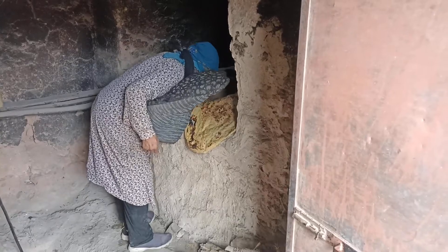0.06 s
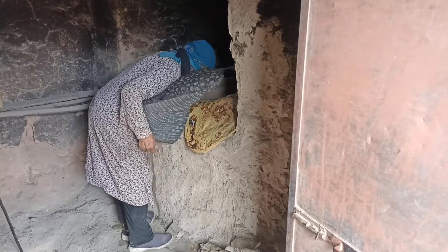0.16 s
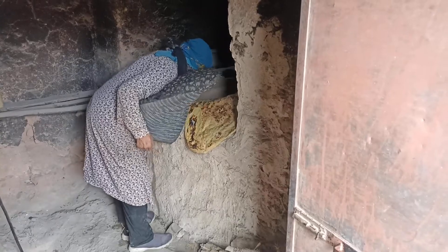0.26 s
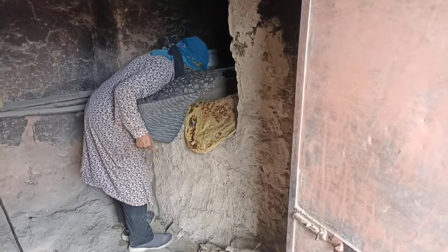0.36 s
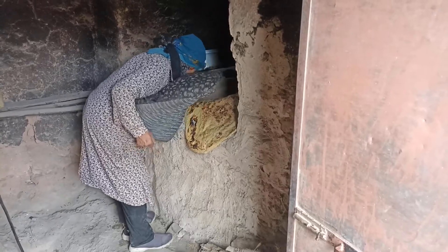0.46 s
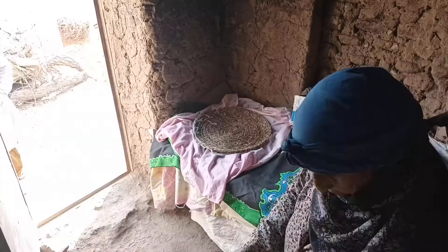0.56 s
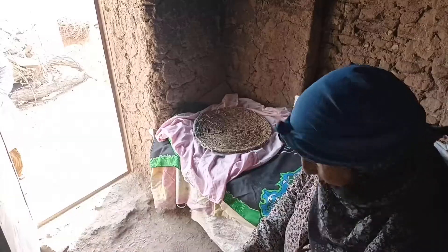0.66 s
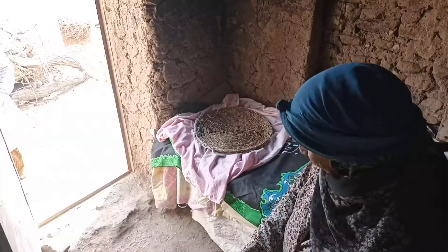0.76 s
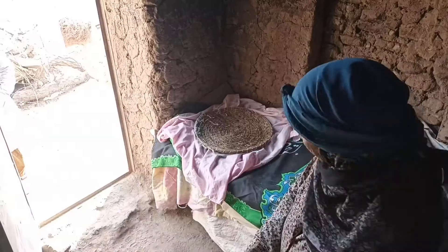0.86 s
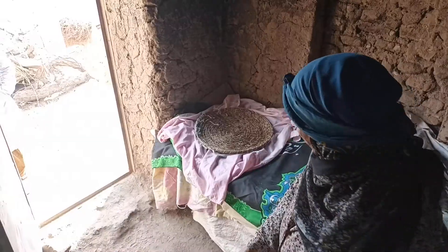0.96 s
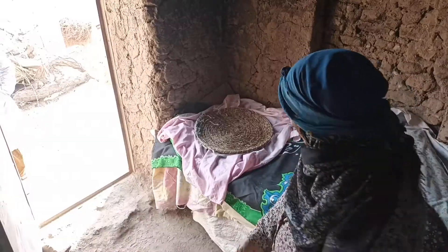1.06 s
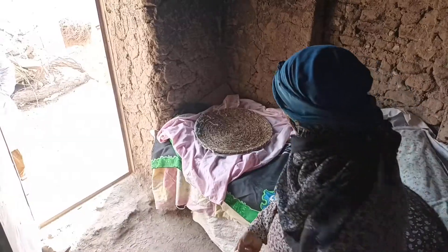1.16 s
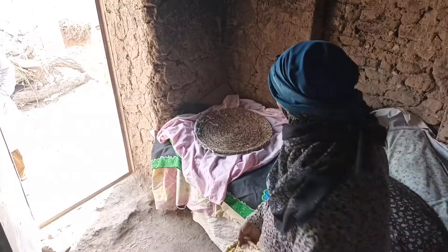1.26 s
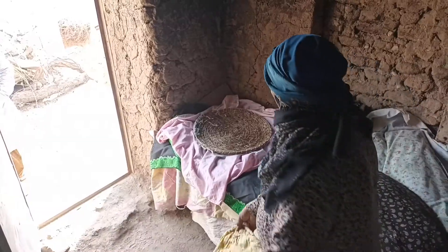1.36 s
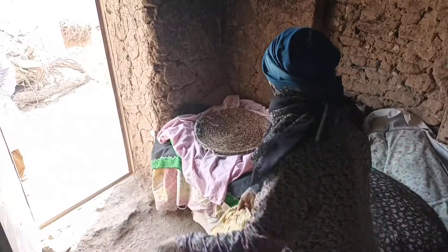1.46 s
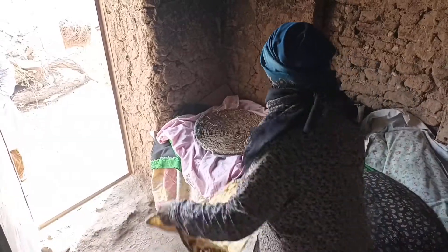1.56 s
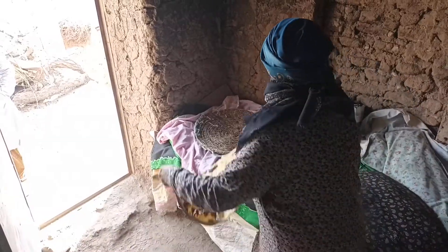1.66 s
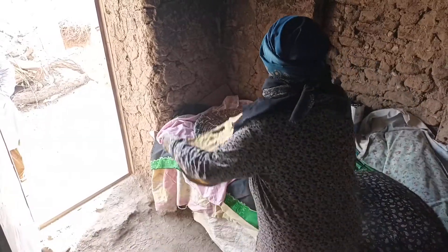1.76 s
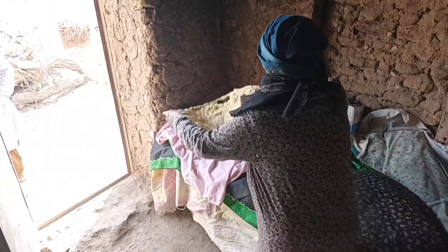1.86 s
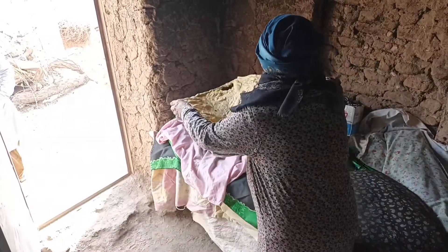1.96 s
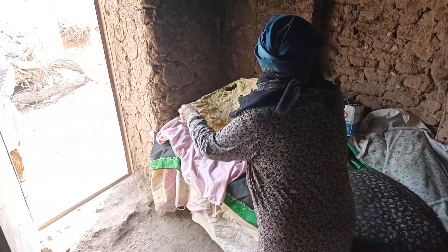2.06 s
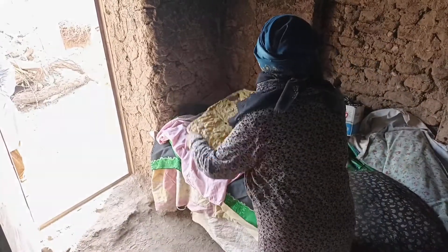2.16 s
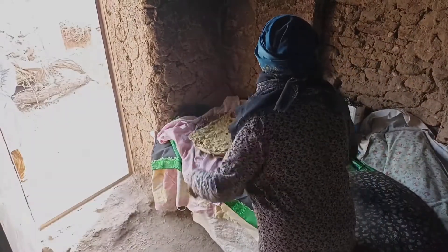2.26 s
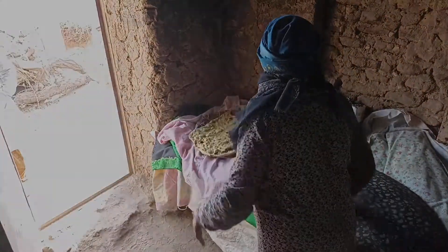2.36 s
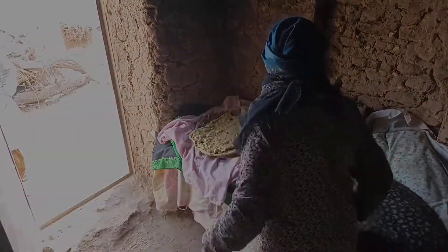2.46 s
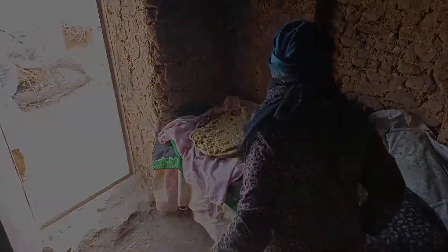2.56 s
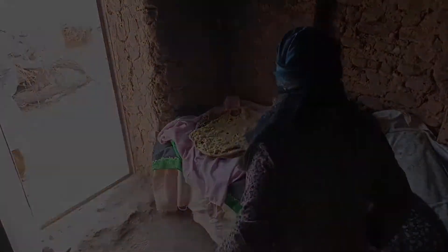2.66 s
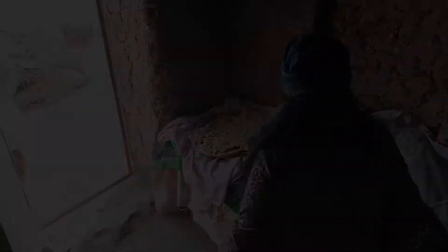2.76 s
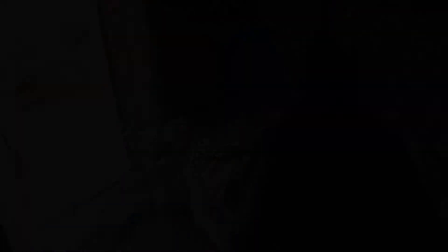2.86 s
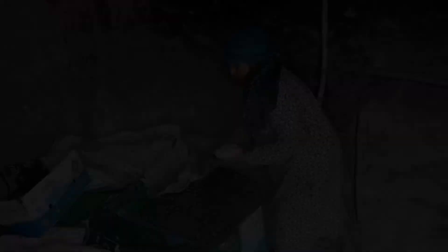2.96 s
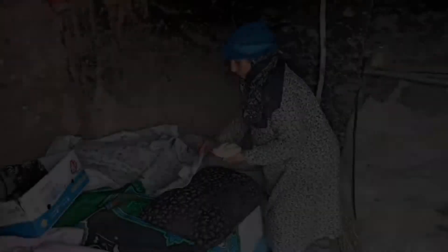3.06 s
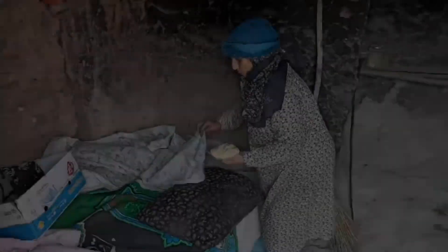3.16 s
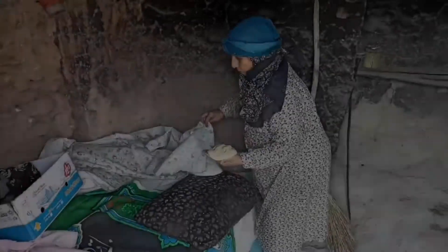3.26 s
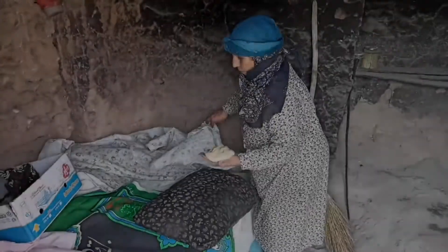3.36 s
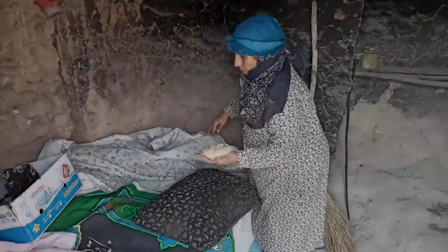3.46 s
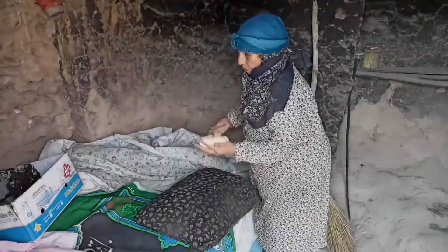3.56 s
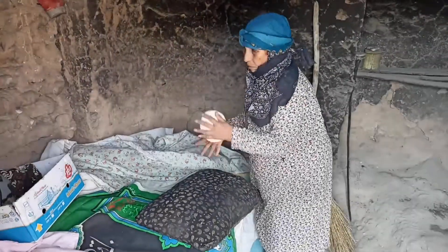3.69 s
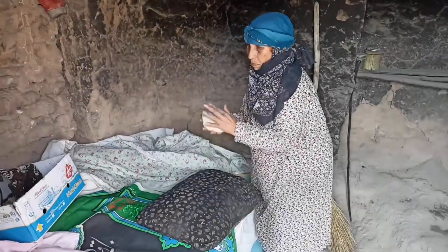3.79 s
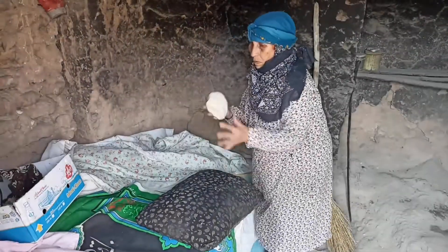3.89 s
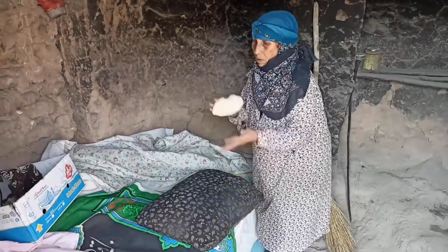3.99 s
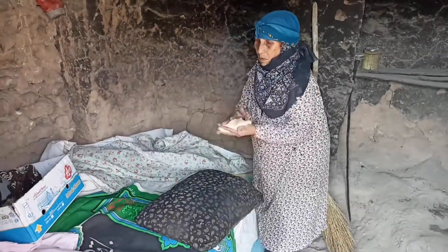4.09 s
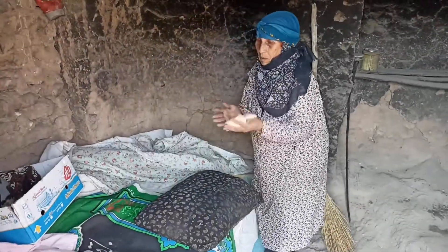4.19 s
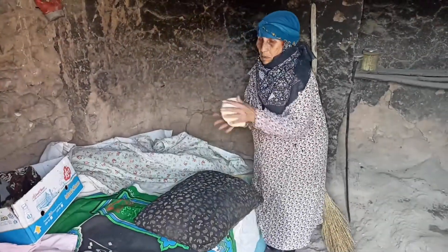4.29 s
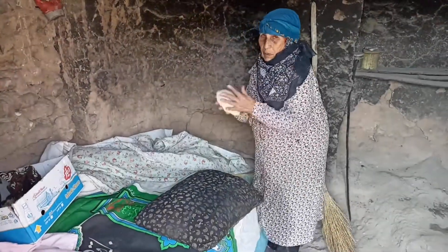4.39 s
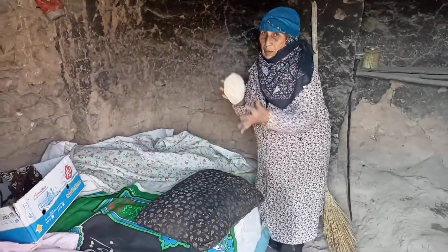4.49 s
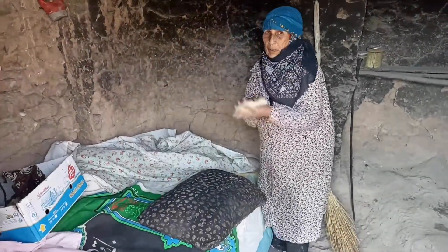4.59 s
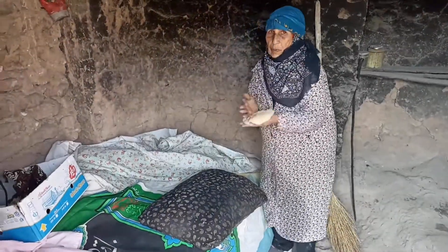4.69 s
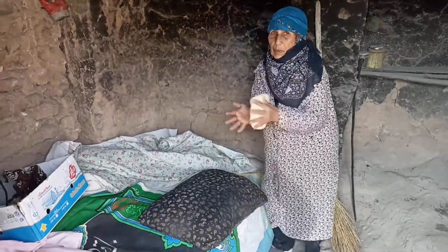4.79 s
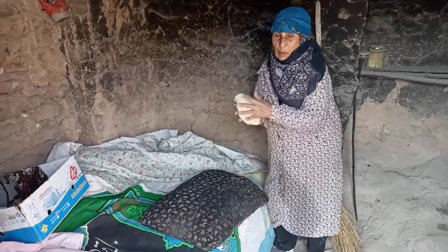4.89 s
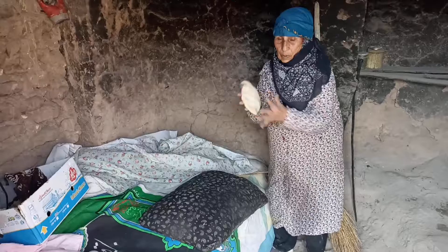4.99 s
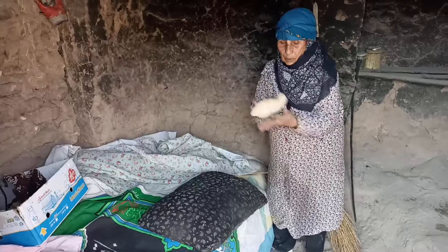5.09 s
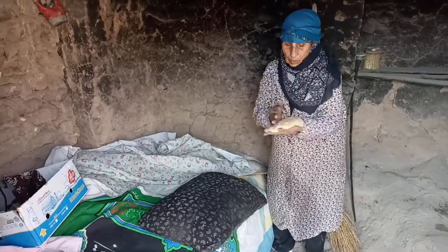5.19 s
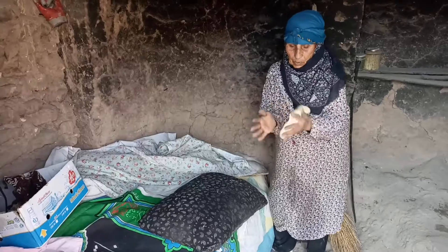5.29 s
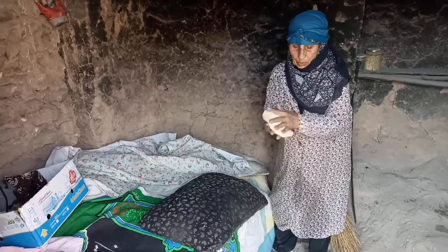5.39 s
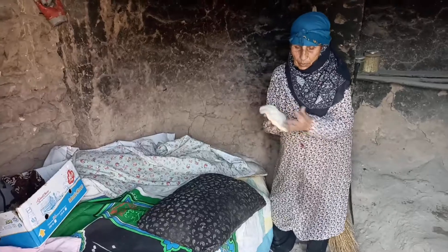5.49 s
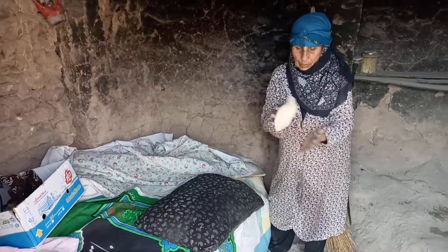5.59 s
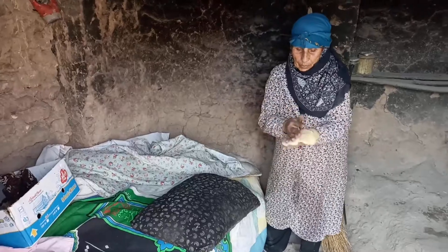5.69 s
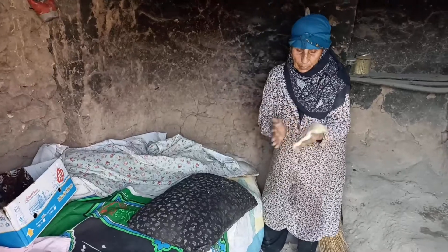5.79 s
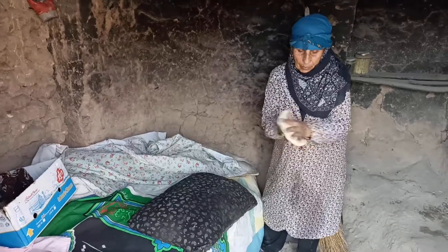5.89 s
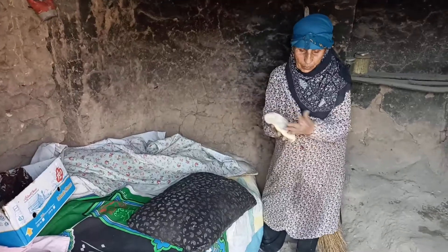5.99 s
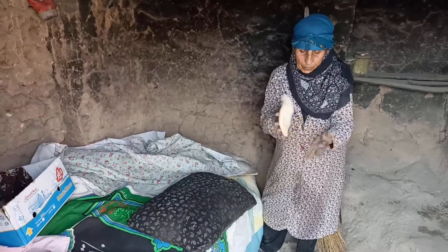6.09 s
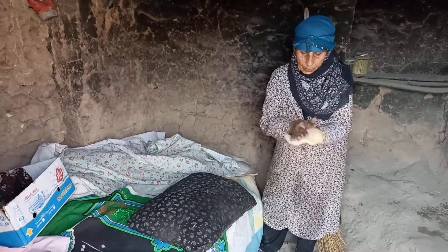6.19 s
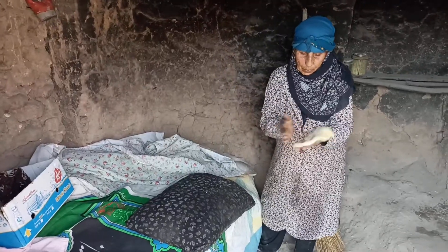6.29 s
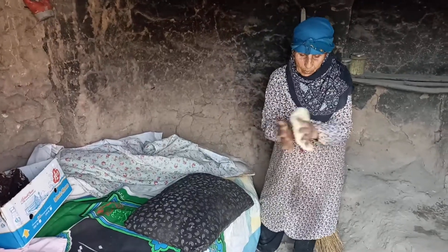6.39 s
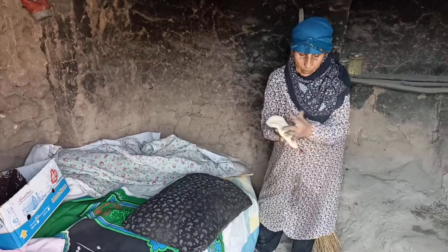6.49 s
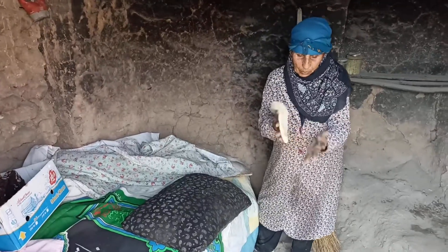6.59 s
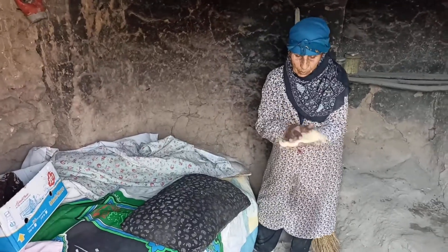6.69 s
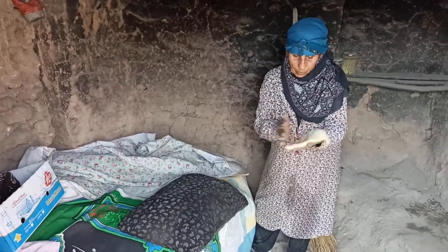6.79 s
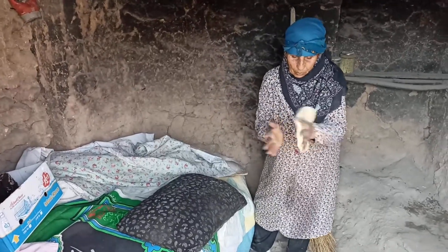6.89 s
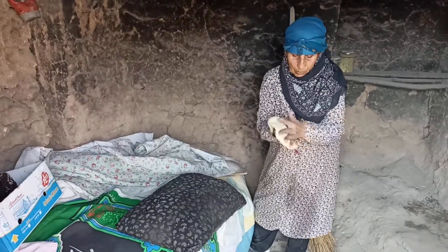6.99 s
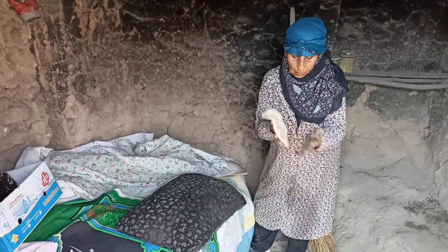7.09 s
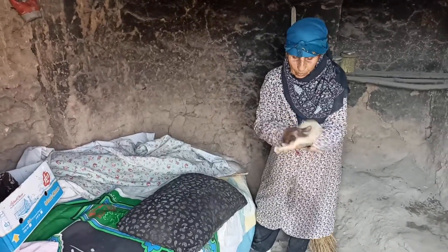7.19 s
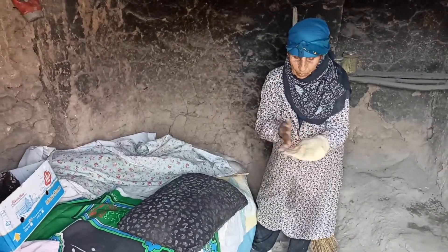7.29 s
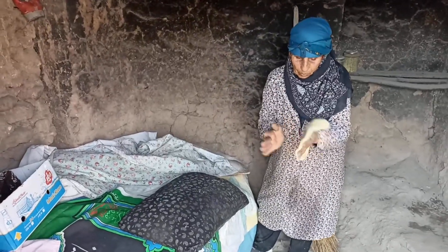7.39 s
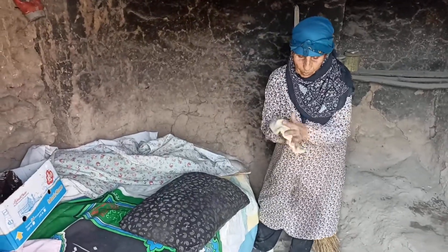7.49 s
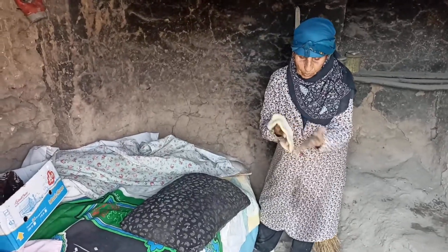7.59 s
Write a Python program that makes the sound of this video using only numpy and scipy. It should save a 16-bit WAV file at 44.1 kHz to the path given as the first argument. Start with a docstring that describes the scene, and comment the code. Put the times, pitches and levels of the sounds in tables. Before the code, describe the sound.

Soft raw dough slapped steadily from palm to palm in a small earthen room, after a dry flatbread slides onto a woven tray.

```python
"""A baker slaps raw dough from palm to palm in a small earthen bakehouse, almost four times a second.
Each slap is a thump of soft dough, a pop of trapped air and a wet smack made of many tiny clicks.
Before that a flat loaf slides onto a woven tray: rough clicks coloured as dry crust, over a low rumble.
Near walls throw the sounds back at once; clothes rustle and crust ticks, made of coloured clicks.
Filtered noise makes a very quiet room, and sine waves make poultry calling far away."""
import sys
import numpy as np
from scipy import signal
from scipy.fft import rfft, irfft
from scipy.io import wavfile
from scipy.ndimage import uniform_filter1d

SR = 44100
rng = np.random.default_rng(int(sys.argv[2]) if len(sys.argv) > 2 else 0)


def dump_mix(stems):
    """Bounce the given channels to the path in sys.argv[1] as a 16-bit WAV at rate SR."""
    frames = np.atleast_2d(stems).T  # one column per channel
    limited = np.clip(frames, -1, 1)  # hard clip at full scale
    pcm = np.round(limited * 32767).astype(np.int16)
    wavfile.write(sys.argv[1], SR, pcm)


N = 337365
T = np.arange(N) / SR  # time of every sample, s

# slaps of dough on palm: t/s, thump f/Hz, smack f/Hz, then thump, air pop and skin smack level/dB
SLAP_EVENTS = [(3.8534, 273, 2550, -37, -47.5, -37.5), (4.138, 304, 2160, -14.5, -17, -22.5),
               (4.414, 295, 2060, -27, -28, -27), (4.688, 284, 2110, -17, -24, -18.5),
               (4.9492, 289, 2600, -18, -31, -28), (5.2111, 313, 1660, -13, -24.5, -20.5),
               (5.4812, 308, 1810, -15.5, -22.5, -23.5), (5.7395, 338, 3550, -19.5, -29.5, -17.5),
               (6.0, 224, 2980, -25.5, -28, -24), (6.2603, 287.4, 3550, -18, -32.5, -18),
               (6.515, 310, 2320, -19, -26.5, -19.5), (6.7725, 321.5, 1870, -17, -23, -18.5),
               (7.0336, 319, 1890, -17.5, -22.5, -16.5), (7.2928, 335, 1624, -18, -19.5, -21.5),
               (7.5518, 335, 1790, -19, -23, -22)]
# tone of wet spray and crisp ticks: f/Hz, level/dB
SPRAY_TONE = [(2000, -33.5), (5000, -16), (6300, 1.5), (8300, 1), (10500, 3.5), (12000, 7), (15500, -1)]
# tone of dry crust and of grazing fingers: f/Hz, level/dB
CRUST_TONE = [(200, -24.5), (400, -8), (800, -8), (1100, -10), (1600, -9.5), (2800, -9.5), (4000, -13),
              (8400, -18), (13300, -14.5), (16000, -24.5)]
# tone of the rumbling tray and of soft bumps: f/Hz, level/dB
TRAY_TONE = [(25, -50), (55, -13), (100, 11.5), (170, -1), (280, -6), (500, -15), (1000, -36)]
# tone of rubbing cloth: f/Hz, level/dB
CLOTH_TONE = [(150, -2), (400, 4.5), (800, 4), (1400, -0.5), (2300, 4), (3400, -0.5), (4600, -6.5),
              (8500, -14), (12500, -15), (16000, -11.5)]


def undb(db):
    """Turn decibels into a gain."""
    return 10 ** (np.asarray(db) / 20)


def unit(x):
    """Scale to an rms (average strength) of 1."""
    return x / np.sqrt(np.mean(x ** 2))


def blow(x):
    """Scale a short sound so its energy equals rms 1 over a fiftieth of a second."""
    return x / np.sqrt(np.sum(x ** 2) / (SR / 50))


def on_log(hz, points):
    """Read a curve of (Hz, value) points, with pitch on a log axis as we hear it."""
    f, value = np.transpose(points)
    return np.interp(np.log(np.maximum(hz, 1)), np.log(f), value)


def colour(x, points):
    """Filter to a (Hz, dB) curve; folding the cepstrum keeps the response from starting early."""
    size = 4096
    gain = undb(on_log(np.fft.rfftfreq(size, 1 / SR), points))
    cepstrum = irfft(np.log(gain))
    cepstrum[1:size // 2] *= 2
    cepstrum[size // 2 + 1:] = 0
    response = irfft(np.exp(rfft(cepstrum)))
    return signal.fftconvolve(x, response)[:len(x)]


def lowpass(x, hz, order=1):
    """Roll off smoothly above hz."""
    sos = signal.butter(order, min(hz, SR / 2 - 1), fs=SR, output="sos")
    return signal.sosfilt(sos, x + 1e-18)


def resonance(x, hz, width_hz):
    """Ring at one pitch, as one band-pass resonance."""
    return signal.lfilter(*signal.iirpeak(hz, hz / width_hz, SR), x)


def even(x, amount=0.71):
    """Level out the chance peaks and holes in the spectrum of a short burst."""
    spectrum = rfft(x)
    power = np.abs(spectrum) ** 2
    levelling = (power + power.mean() / 20) ** (min(amount, 1) / 2)
    return irfft(spectrum / levelling, len(x))


def add(out, s, x):
    """Mix x into out from time s."""
    i = int(s * SR)
    out[..., i:i + x.shape[-1]] += x[..., :out.shape[-1] - i]


def walk(rate):
    """Wander slowly by chance around zero, with rms 1."""
    hold = int(SR / rate)
    steps = np.repeat(rng.standard_normal(N // hold + 1), hold)
    return unit(uniform_filter1d(steps, hold)[:N])


def grains(size, spread_db):
    """Make dense tiny clicks of very unequal strength, as rough surfaces do."""
    boost = np.minimum(rng.exponential(size=size), 2 * np.pi)
    return unit(rng.standard_normal(size) * undb(spread_db * boost))


def burst(t, rise_s, decay_s):
    """Shape a contact that spreads quickly and dies away; t = 0 is the moment of full contact."""
    return np.exp(np.minimum(t / rise_s, -t / decay_s))


def rub(s, rise_s, decay_s, db, tone):
    """Make one brief gritty contact of the given colour, its envelope peaking at time s."""
    out, lead = np.zeros(N), 1 / 10
    t = np.arange(SR // 3) / SR - lead
    contact = grains(len(t), 3.5) * burst(t, rise_s, decay_s)
    add(out, s - lead, undb(db) * blow(colour(contact, tone)))
    return out


def reflections(port_lag_s=.00007, scatter_s=0.00065):
    """Direct sound and near surfaces: rough mud walls mirror the bass and scatter the treble."""
    # near surfaces: delay t/s, mirrored bass level/dB, scattered treble level/dB, crossover f/Hz
    walls = [(.0043, 3, 4.5, 787), (.0074, -2.5, -16.5, 556.5), (0.017, -20.5, -11, 700),
             (.026, -9, -22.5, 520)]
    t = np.arange(SR // 100) / SR
    click, response = signal.unit_impulse(len(t)), np.zeros((2, SR // 20))
    for port in range(2):
        add(response[port], port * port_lag_s, click)
        for delay, bass_db, treble_db, cross_hz in walls:
            spread = even(rng.standard_normal(len(t)) * np.exp(-t / scatter_s))
            spread = (spread - lowpass(spread, cross_hz)) / np.linalg.norm(spread)
            mirrored = undb(bass_db) * lowpass(click, cross_hz)
            add(response[port], delay, mirrored + undb(treble_db) * spread)
    return response


def ring(onset_s=0.007, build_s=0.0052, ring_db=-1, apart_hz=750):
    """Short diffuse ring of the earthen room; its bass is alike at both listening ports."""
    # ring of the room in bands: f/Hz, level/dB before ring_db, time to fade by 60 dB t/s
    bands = [(49.9, -10, .2), (100, -15, 0.18), (152.3, 2, 0.29), (233, -3.5, .18), (399, -2, .14),
             (814, -1.5, 0.13), (2500, -6, 0.13), (6000, -6.5, 0.12), (15160, -5.5, 0.052)]
    t = np.arange(SR // 4) / SR
    f = np.fft.rfftfreq(len(t), 1 / SR)
    mid, side = rfft(rng.standard_normal((2, len(t))))
    apart = np.minimum(f / apart_hz, 1)
    noise = (mid + apart * side * np.array([[1], [-1]])) / np.sqrt(1 + apart ** 2)
    build = 1 - np.exp(-np.maximum(t - onset_s, 0) / build_s)
    response = 0
    for share, (_, db, t60) in zip(np.eye(len(bands)), bands):
        band = on_log(f, np.c_[np.array(bands)[:, 0], share])
        fade = build * np.exp(-np.log(1000) * t / t60)
        response = response + undb(db + ring_db) * irfft(noise * band, len(t)) * fade / np.linalg.norm(fade)
    return response


def bakehouse(x, distance_db=-5.5):
    """Carry a sound through the room to two listening ports a few steps away."""
    response = ring()
    add(response, 0, reflections())
    return undb(distance_db) * signal.fftconvolve(x[None], response, axes=1)


def air():
    """Faint steady background: a shared low murmur and separate hiss at each port."""
    # tone of the quiet room: f/Hz, level/dB
    air_tone = [(25, -38), (55, -8), (90, -6), (135, -3.5), (190, -7), (310, -9), (530, -14), (1190, -18.5),
                (2200, -22.5), (3300, -25.5), (4200, -31.5), (6500, -29.5), (8500, -41), (12500, -30.5),
                (16000, -34.5)]
    left, right, shared = (colour(rng.standard_normal(N), air_tone) for _ in range(3))
    murmur = 0.85 * lowpass(shared, 340)
    level_db = -61.5 + .5 * walk(2.0)
    return unit(np.array([left, right]) + murmur) * undb(level_db)


def clothes():
    """Fibres slip over each other in uneven little rushes: one swell per movement, then swinging arms."""
    # body movements: peak t/s, rise t/s, level/dB
    movements = [(.81, 0.052, -68.5), (1.0, 0.27, -65), (1.32, 0.097, -59), (1.62, 0.2, -65),
                 (1.93, 0.063, -63), (2.51, 0.13, -61.5), (3.5, 0.32, -62.5), (3.76, 0.14, -65.5)]
    stop_share = 0.28  # each stops sooner than it builds: decay time against rise time
    moves = sum(undb(db) * burst(T - s, rise_s, stop_share * rise_s) for s, rise_s, db in movements)
    # sleeves swing all through the slapping
    sleeves = undb(-68.5) * np.clip((T - SLAP_EVENTS[0][0]) / .4, 0, 1)
    rustle = unit(colour(grains(N, 3.5), CLOTH_TONE))
    return rustle * np.hypot(moves, sleeves) * undb(0.6 * walk(35))


def ticks(rise_s=.0004, decay_s=.002, scatter_db=4):
    """Sudden tiny slips give clear ticks, and fainter random ones from the crust of the carried loaf."""
    # clearest ticks of crust and cloth: t/s, crisp top level/dB, papery body level/dB
    clear = [(1.015, -62.5, -58.5), (1.444, -63, -65.5), (1.496, -61, -65.5), (1.595, -60.5, -57.5),
             (3.536, -68, -62), (6.704, -62.5, -57)]
    carry_from_s, carry_to_s = 1, 2.15
    crackle_per_s, crackle_db = 12, -74  # middle of the random levels
    chance = rng.random((int(crackle_per_s * (carry_to_s - carry_from_s)), 3))
    faint = []
    for row in chance:
        s = np.interp(row[0], [0, 1], [carry_from_s, carry_to_s])
        faint.append((s, *(crackle_db + scatter_db * (2 * row[1:] - 1))))
    out = np.zeros(N)
    for s, top_db, body_db in list(clear) + faint:
        out += rub(s, rise_s, decay_s, top_db, SPRAY_TONE)
        out += rub(s, rise_s, decay_s, body_db, CLOTH_TONE)
    return out


def handling(rise_share=0.54):
    """Hands take hold of tray and cloth: each brief touch is a soft bump and a scuff of cloth."""
    # touches: t/s, length t/s, soft bump level/dB, scuff level/dB
    touches = [(1.971, 0.023, -63, -50), (2.44, .03, -50.5, -68), (2.827, 0.016, -53, -78),
               (2.95, 0.012, -58, -53), (3.058, 0.044, -49, -60.5), (3.63, 0.027, -77, -55.5),
               (3.741, 0.0045, -68, -59)]
    out = np.zeros(N)
    for s, length, bump_db, scuff_db in touches:
        for db, tone in ((bump_db, TRAY_TONE), (scuff_db, CLOTH_TONE)):
            out += rub(s, rise_share * length, length, db, tone)
    return out


def loaf(drag_db=-12):
    """Dry crust catches on the weave, duller as it settles; the tray rumbles under drag and landings."""
    # the near edge lands, then the whole loaf: t/s, level/dB
    landings = [(2.271, -40), (2.344, -33)]
    start_s, attack_s, hold_s, release_s = 2.252, 0.013, .11, 0.023  # one push
    slide_db, fade_db_per_s, crisp_s = -38, -25, .09
    t = np.clip(T - start_s, 0, 1)
    release = np.exp(-np.maximum(t - attack_s - hold_s, 0) / release_s)
    push = np.minimum(t / attack_s, 1) * release * undb(slide_db + fade_db_per_s * t)
    crust = unit(colour(grains(N, 4.0), CRUST_TONE))
    dull = lowpass(crust, 1900)
    scrape = dull + np.exp(-t / crisp_s) * (crust - dull)
    rumble = unit(colour(grains(N, 4.3), TRAY_TONE))
    weight = sum(undb(db) * burst(T - s, 0.007, 0.017) for s, db in landings)
    crunch = undb(-8) * weight  # crust against the thud
    return (push + crunch) * scrape + (undb(drag_db) * push + weight) * rumble


def fingers(graze_hz=5500, sticky_db=-6):
    """Fingers graze the dough before some slaps, and it peels stickily off the palm after each."""
    # fingers touch just before the palm: peak t/s, rise t/s, level/dB
    grazes = [(3.845, 0.0072, -50), (4.121, .0012, -37.5), (4.943, 0.015, -38.5), (5.724, 0.0018, -34),
              (7.279, 0.0028, -32.5), (7.538, 0.0056, -38)]
    peel_after_s, peel_s, peel_db, peel_scatter_db = .105, 0.0133, -44.5, 2  # level against the smack
    out = lowpass(sum(rub(s, rise_s, .012, db, CRUST_TONE) for s, rise_s, db in grazes), graze_hz, order=2)
    for (s, *_, smack_db), chance in zip(SLAP_EVENTS, rng.standard_normal(len(SLAP_EVENTS))):
        db = smack_db + peel_db + peel_scatter_db * chance
        for tone, tone_db in ((CLOTH_TONE, db), (SPRAY_TONE, db + sticky_db)):
            out += rub(s + peel_after_s, .004, peel_s, tone_db, tone)
    return out


def slap(thump_hz, smack_hz, thump_db, pop_db, smack_db, spray_db, pop_pitch, t,
         cup_gain=0.96, touch_db=-19, radiate_hz=125):
    """The palm lands, air pops out and the dough swings for about a cycle."""
    # air squeezed from the cupped palm: f/Hz before pop_pitch, width f/Hz, level/dB
    palm = [(677, 388, 0.5), (768, 60, -2.5), (998, 83, -10.5)]
    # tone of flat skin meeting dough: f/Hz, level/dB
    smack_tone = [(500, -18.5), (1300, -5), (1850, 0), (2400, 0.5), (2850, -3), (3550, 0.5), (4300, -5.5),
                  (5200, -10), (6500, -9.5), (8000, -19.5), (16000, -39)]
    # harder slaps bring the whole palm in sooner: mean thump and smack level/dB, contact t/s
    contact_times = [(-23, 0.0071), (-18, .0017)]
    after = np.maximum(t + 0.00035, 0)
    swing = np.sin(2 * np.pi * thump_hz * after) * np.exp(-after / 0.0023) * (1 - np.exp(-after / 0.0012))
    # something as small as a hand hardly radiates deep bass
    swing = signal.sosfilt(signal.butter(2, radiate_hz, "high", fs=SR, output="sos"), swing)

    landed, touched = (np.clip((t + ahead) / 0.0002, 0, 1) for ahead in (.0008, .0045))
    puff = landed * even(rng.standard_normal(len(t)) * burst(t, 0.0001, 0.0014))
    pop = 0
    for hz, width, db in palm:
        once = resonance(puff, pop_pitch * hz, width)
        pop = pop + undb(db) * resonance(once, pop_pitch * hz, width)

    # skin meets dough in a rush of tiny contacts; the edge touches a few ms before the whole face
    contact_s = np.interp((thump_db + smack_db) / 2, *np.transpose(contact_times))
    face = blow(landed * even(grains(len(t), 3.35) * burst(t - .0003, 0.00017, contact_s)))
    edge = blow(touched * grains(len(t), 2.3) * burst(t, .02, .008))
    contacts = face + undb(touch_db) * edge
    smack = colour(contacts, smack_tone)
    smack = smack + cup_gain * resonance(smack, smack_hz, 380)  # the gap under the palm differs each time
    skin = blow(smack) + undb(spray_db) * blow(colour(contacts, SPRAY_TONE))
    return undb(thump_db) * blow(swing) + undb(pop_db) * blow(pop) + undb(smack_db) * blow(skin)


def dough():
    """Slaps get wetter and their pops higher; the hands move, so the room answers each differently."""
    out, lead = np.zeros((2, N)), 1 / 20
    t = np.arange(SR // 8) / SR - lead
    for s, *stroke in SLAP_EVENTS:
        worked_s = s - SLAP_EVENTS[0][0]
        spray_db = -14.5 + 0.42 * worked_s  # against the smack; grows as the dough spreads
        pop_pitch = 0.922 + .045 * worked_s  # the air pocket shrinks as the dough flattens
        add(out, s - lead, bakehouse(slap(*stroke, spray_db, pop_pitch, t)))
    return out


def fowl():
    """Far calls rise to a top pitch, then sag and fade; only the middle harmonics carry indoors."""
    # a long crow and two short squawks: t/s, length t/s, top pitch f/Hz, starting level/dB
    calls = [(4.87, 1, 580.5, -64.5), (6.118, 0.15, 550, -73.5), (7.416, 0.155, 855, -69)]
    attack_s, release_s, fade_db_per_s = .04, .05, -16
    top_share, sag = 0.14, 0.078  # where the pitch tops; share of pitch lost per call length either side
    out = np.zeros(N)
    for s, length, top_hz, db in calls:
        t = np.clip(T - s, 0, length)
        hz = top_hz * (1 - sag * np.abs(t / length - top_share))
        phase = 2 * np.pi * np.cumsum(hz * (1 + 0.0029 * walk(40))) / SR
        gate = np.minimum(np.minimum(t / attack_s, (length - t) / release_s), 1)
        voice = np.sin(2 * phase) / 2 + np.sin(3 * phase)
        out += gate * undb(db + fade_db_per_s * t) * voice
    return out


def scene():
    """All the work, heard through the room by two ports of unlike colour."""
    # colour of the two ports: f/Hz, left minus right level/dB
    ports = [(60, 0.5), (200, 0.5), (380, 2.5), (700, -1), (1300, 0.5), (2400, -5), (4400, -3.5),
             (7000, -5), (10000, 8), (15000, 6)]
    others = fingers() + loaf() + clothes() + handling() + ticks() + fowl()
    heard = dough() + bakehouse(others)[:, :N]
    sides = [colour(x, [(f, sign * db / 2) for f, db in ports]) for x, sign in zip(heard, (1, -1))]
    return np.array(sides) + air()


def record(dry, ceiling=0.81):
    """The loudest peaks are rounded, the sound drops out for a moment early on, and the top is cut."""
    silent_from_s, silent_to_s, top_hz = .425, .523, 16000
    live = uniform_filter1d(1. * ((T < silent_from_s) | (T > silent_to_s)), size=200)
    rounded = ceiling * np.tanh(dry / ceiling)
    return signal.sosfilt(signal.ellip(8, .2, 70, top_hz, fs=SR, output="sos"), live * rounded)


dry = scene()
out = record(dry)
dump_mix(out)
```